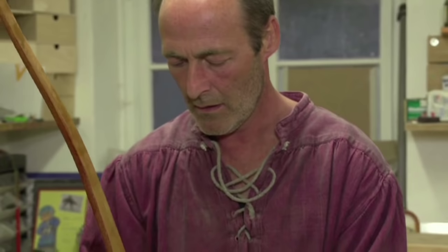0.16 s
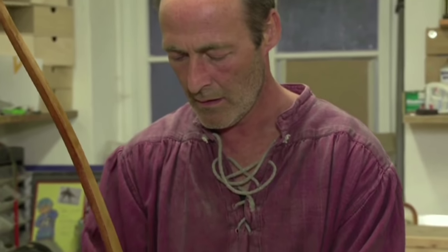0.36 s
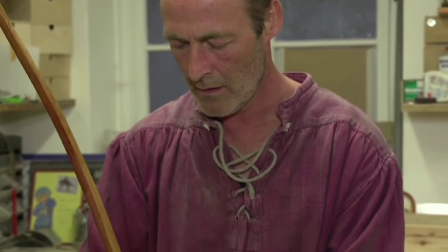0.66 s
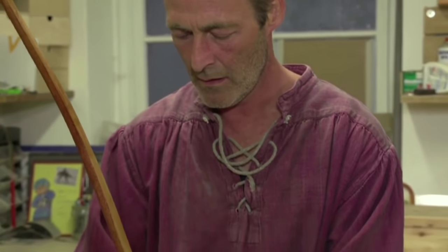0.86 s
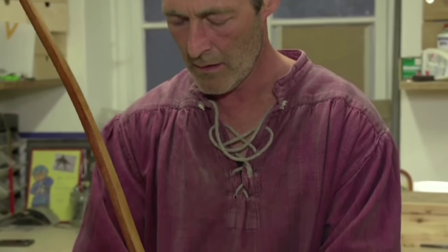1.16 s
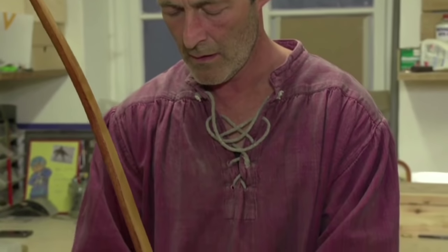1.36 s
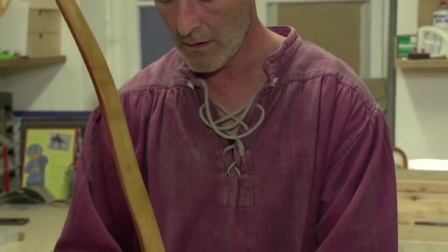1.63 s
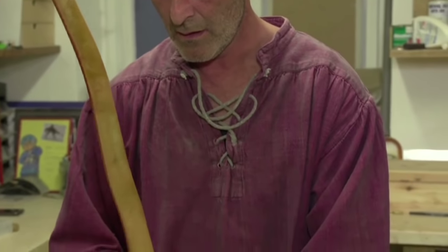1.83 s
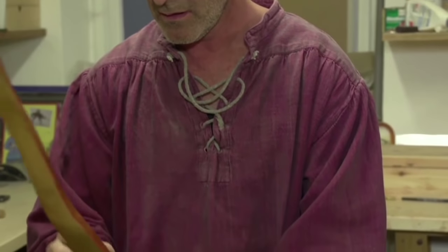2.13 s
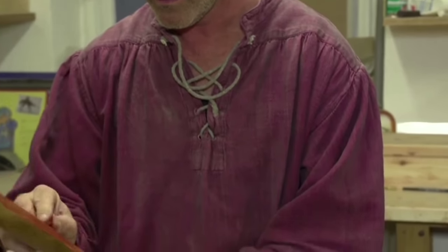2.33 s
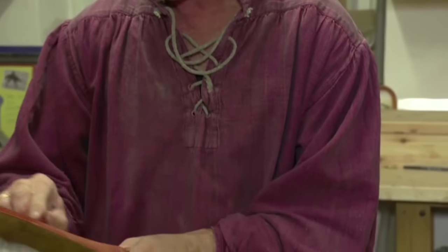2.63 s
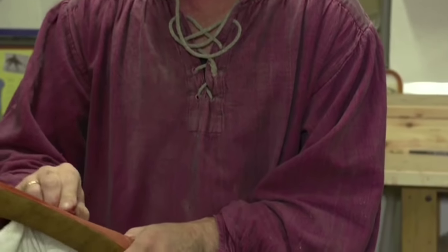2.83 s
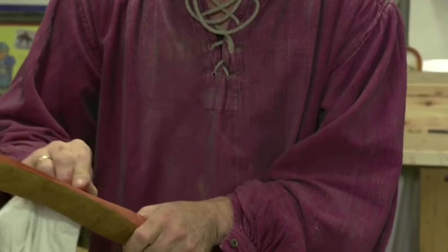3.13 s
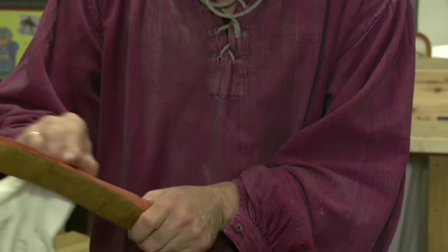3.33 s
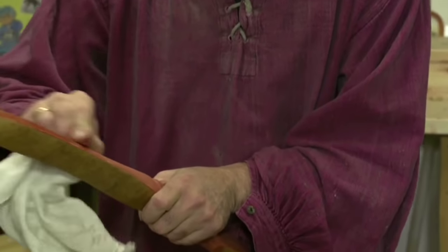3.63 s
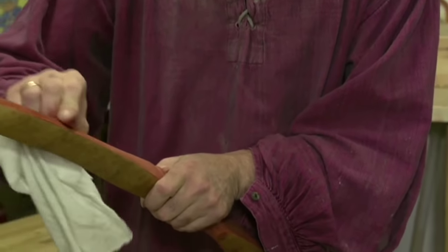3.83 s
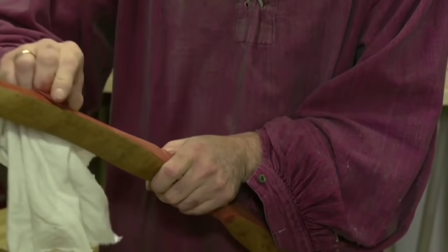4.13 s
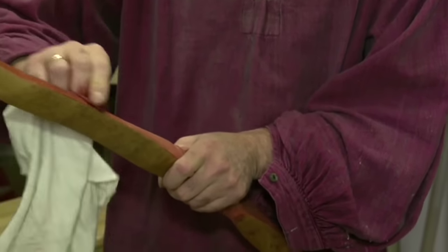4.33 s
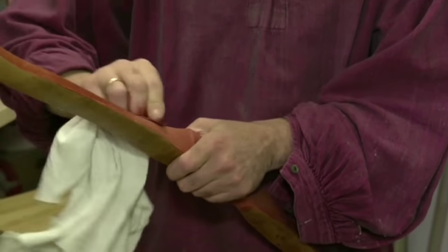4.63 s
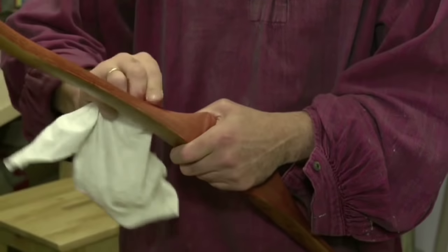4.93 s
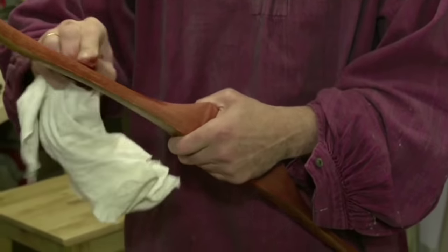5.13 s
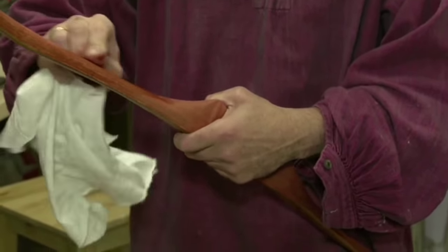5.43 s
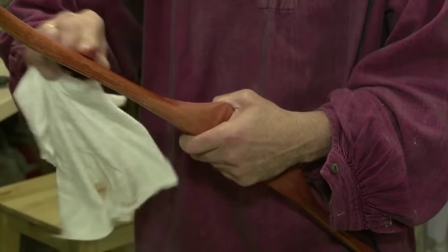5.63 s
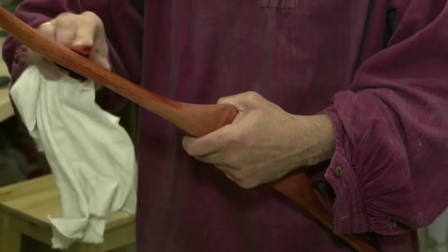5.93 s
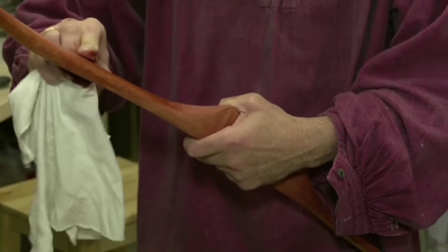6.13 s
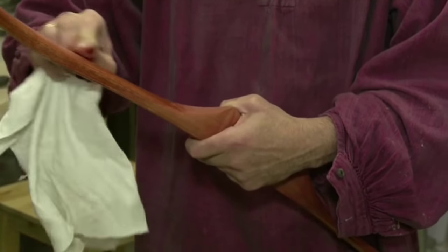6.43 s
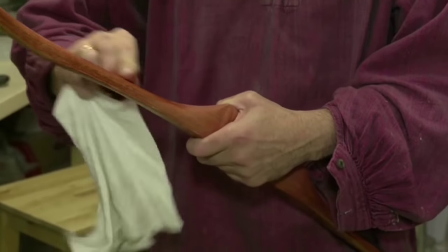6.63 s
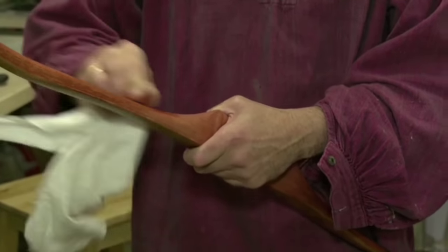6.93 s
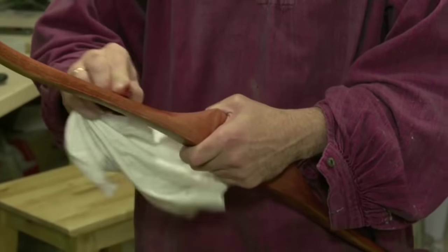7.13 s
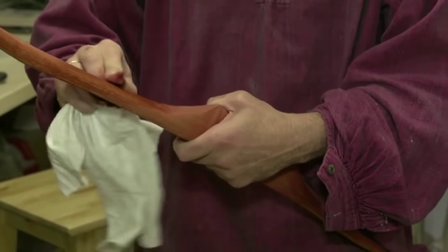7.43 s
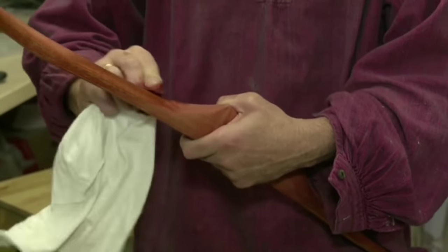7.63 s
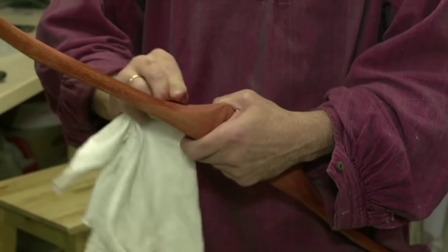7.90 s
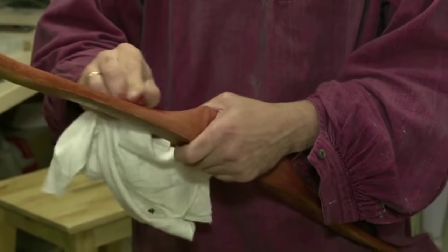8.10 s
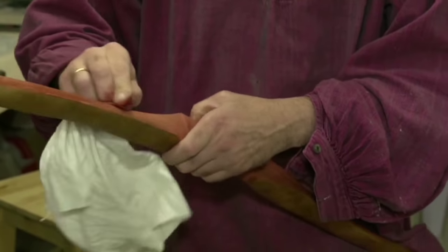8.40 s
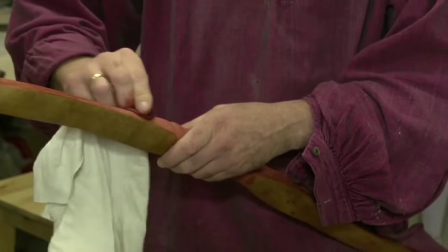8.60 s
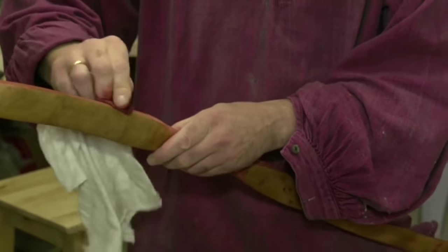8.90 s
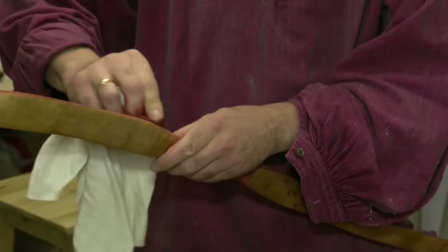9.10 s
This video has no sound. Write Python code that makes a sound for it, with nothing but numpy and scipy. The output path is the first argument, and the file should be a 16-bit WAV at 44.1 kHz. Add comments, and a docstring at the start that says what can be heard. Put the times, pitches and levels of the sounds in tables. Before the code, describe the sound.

A close microphone in a small workshop hears a cloth rubbed on a wooden bow limb. From 0 to 1.5 s the strokes are light, thin and quick, slowing to one longer pass after 1 s; from about 1.6 to 2 s the rubbing nearly disappears. At 2.05 s a soft bump and rustle bring a firmer stroke, and brisk push-pull swishing settles in at about seven strokes a second, dry and bright with tiny thread ticks and a faint hollow woody ring. Soft thuds fall near 4.3 and 6 s, with low padded knocks at 5.3-5.8 and 6.2 s. Around 7-7.8 s bumps cluster, with a knock and muffled cloth flaps. The rubbing grows duller after 8 s, with bumps near 8.2, 8.6 and 9 s and the strongest thud at 9.2 s, just before the end. Low rumble, weak hum and faint air remain throughout.

```python
"""Cloth rubbed on a wooden bow

A cloth is rubbed briskly to and fro along a bow limb in a small workshop, often about seven strokes a second.
Shaped noise makes each stroke grip, hiss and slow to the turn; resonances let the limb ring faintly under it.
Gritty noise makes cloth and sleeves rustle; decaying tones are knocks, and short low pulses are soft bumps.
Behind them, coloured noise gives a low rumble and faint air, and narrow bands of noise give a hum."""
import sys
import numpy as np
from scipy import signal
from scipy.fft import rfft, irfft, next_fast_len
from scipy.io import wavfile
from scipy.ndimage import uniform_filter1d

SR = 44100
rng = np.random.default_rng(int(sys.argv[2]) if len(sys.argv) > 2 else 0)


def transcribe(signal):
    """Save signal, clipped to [-1, 1], as a 16-bit WAV file at the path in sys.argv[1]."""
    frames = np.atleast_2d(signal).T
    limited = np.clip(frames, -1, 1)
    pcm = np.round(limited * 32767).astype(np.int16)
    wavfile.write(sys.argv[1], SR, pcm)


N = 408366
TIME = np.arange(N) / SR
SIZE = next_fast_len(N, real=True)
FREQS = np.maximum(np.arange(SIZE // 2 + 1) * SR / SIZE, 1)


def from_db(db):
    """Turn decibels into gain."""
    return 10 ** (np.asarray(db) / 20)


def rms_one(x):
    """Scale to an rms (average strength) of 1."""
    return x / np.sqrt(np.mean(x ** 2) + 1e-20)


def over_time(points):
    """Join (time, value) points with straight lines."""
    return np.interp(TIME, *np.transpose(points))


def over_hz(points):
    """Join (frequency, value) points on a log-frequency axis."""
    hz, value = np.transpose(points)
    return np.interp(np.log(FREQS), np.log(hz), value)


def resonances(modes):
    """Gain over frequency of (frequency, width, level) resonances; each level sets the power of its peak."""
    power = 0
    for hz, width, db in modes:
        detuning = (FREQS ** 2 - hz ** 2) / (FREQS * width)
        power = power + from_db(db) ** 2 / width / (1 + detuning ** 2)
    return np.sqrt(power)


def filtered(x, gain):
    """Apply a gain over frequency."""
    return irfft(rfft(x, SIZE) * gain, SIZE)[..., :N]


def drift(rate_hz):
    """Random wandering of rms 1, mostly slower than the given rate."""
    return rms_one(filtered(rng.standard_normal(N), 1 / (1 + (FREQS / rate_hz) ** 4)))


# how alike left and right are: (frequency [Hz], likeness [0-1])
SIDE_LIKENESS = [(25, 1), (55, 1), (90, 0.99), (150, 0.97), (300, 0.94), (1200, .97), (2500, 1),
                 (4500, 0.9), (9000, 0.82), (15000, 0.75)]


def noise(gain, grain=1):
    """Stereo noise of a given colour, less alike in the treble; a varying grain makes it gritty."""
    alike = np.clip(over_hz(SIDE_LIKENESS), 0, .9995)
    raw = rng.standard_normal((2, N)) * grain
    mid, side = filtered(raw, gain * np.sqrt([1 + alike, 1 - alike]))
    return rms_one(np.array([mid + side, mid - side]))


# strokes, push and pull in turn, each lasting until the next; the swell is the rise along the stroke:
# (start time [s], relative level [dB], swell [dB], time to grip [s])
STROKE_LIST = [(0.0, -52.5, -7, 0.0038), (.074, -51, 1, 0.011), (.219, -49, 1.5, 0.008),
               (.364, -49, 0.5, 0.011), (.557, -53.5, -2.5, .014), (.666, -50, 1.5, .025),
               (.84, -50.5, -3, .01), (.98, -50.5, 2, 0.019), (1.49, -55, -1.5, 0.022),
               (1.612, -62.5, -18, 0.022), (2.05, -43.5, 4.5, 0.083), (2.25, -46.5, -1, 0.031),
               (2.419, -44.5, 0.5, 0.0087), (2.548, -47, -0.5, .01), (2.69, -44, 0.5, 0.005),
               (2.816, -45.2, 1.5, 0.018), (2.983, -44, 5, 0.0065), (3.125, -44.5, 0.5, 0.015),
               (3.282, -44, 3, 0.016), (3.424, -46, 1, .014), (3.584, -42.5, 1.5, 0.008),
               (3.696, -45.5, 3, .02), (3.872, -43.5, -1.5, 0.0035), (3.994, -44.5, 4, .01),
               (4.151, -43.5, 6, .007), (4.322, -44.5, 0, 0.023), (4.494, -43.5, 4, 0.033),
               (4.644, -46, 3, 0.03), (4.816, -43, 0.5, 0.031), (4.957, -46.5, 2, 0.022),
               (5.104, -43.5, 0, .005), (5.233, -47, 2.5, 0.019), (5.385, -44.5, 1, 0.0079),
               (5.505, -48.5, -0.5, .018), (5.627, -46, -2.5, 0.013), (5.74, -49.5, -4, .011),
               (5.843, -45.5, -0.5, 0.0085), (5.95, -48.5, 2.5, .011), (6.079, -45, 3, .006),
               (6.262, -47, 3, .013), (6.491, -44.5, 7.5, 0.0092), (6.714, -47.5, -2.5, 0.014),
               (6.872, -46.8, -1, 0.029), (7.005, -46.5, -1.5, 0.019), (7.157, -47.5, -0.5, 0.02),
               (7.303, -46.7, -1.5, .03), (7.449, -47, 4, 0.019), (7.619, -48, -0.5, 0.03),
               (7.76, -46, 6, 0.013), (7.911, -48, -2, 0.013), (8.065, -46.5, 2.5, 0.029),
               (8.231, -49, -0.5, 0.0049), (8.363, -45, -1, 0.0064), (8.486, -48.5, 1.5, 0.0093),
               (8.614, -44, 0.5, .004), (8.757, -47.5, -2, 0.009), (8.895, -46, -0.5, 0.0045),
               (9.026, -50, -1, 0.0075), (9.173, -51, 2.5, 0.0089)]
# resonance of the hand cupped round the cloth, before the swell adds to it: (time [s], level [dB])
HAND_CUP = [(0, 3), (1.15, -2), (1.7, 1), (2.6, -0.5), (3.2, -0.5), (3.9, -5), (4.3, -1), (6.7, -.5),
            (7.8, -2), (8.6, -5)]
CUP_PER_SWELL = 0.74  # the hand closes as it bears down: dB of resonance per dB of swell
# dip at the turn for an ordinary grip time; it is shallower by some dB for each doubling of that time
LULL_DB, ORDINARY_GRIP_S, LULL_DB_PER_DOUBLING = -9, 0.013, 2
CATCH, CATCH_SHARE = 0.72, 0.32  # this share of the rise comes in this share of the grip time
SLOWING_SHARE, LONGEST_SLOWING_S = 0.4, 0.095  # the last part of a stroke slows to the turn
BRAKING, BRAKING_SHARE = .82, 0.68  # this share of the fall comes in this share of the slowing
LATER_PER_SWELL = 0.038  # a stroke that bears down stops faster: share of slowing lost per dB of swell
FIRM_WOOD_DB = -1  # woodiness of a firm stroke
BRUSHING_DB, WOOD_STAYS = -51.5, 0.77  # below this level, woodiness regains this share of the drop


def stroke_controls():
    """Friction level, woodiness and cupping in dB: each stroke breaks loose, slides, then slows to the turn."""
    start, stroke_db, swell_db, grip_s = np.transpose(STROKE_LIST)
    end = np.append(start[1:], TIME[-1] + .04)
    bears_db = np.maximum(swell_db, 0)
    slow_s = np.minimum(SLOWING_SHARE * (end - start), LONGEST_SLOWING_S)
    slow_s = slow_s * np.clip(1 - LATER_PER_SWELL * bears_db, .2, 1)
    gripped, slowing = start + grip_s, end - slow_s

    first_db, last_db = stroke_db - swell_db / 2, stroke_db + swell_db / 2
    lull_db = LULL_DB + LULL_DB_PER_DOUBLING * np.log2(grip_s / ORDINARY_GRIP_S)
    turn_db = (np.append(first_db[0], last_db[:-1]) + first_db) / 2 + lull_db
    caught_db = turn_db + CATCH * (first_db - turn_db)
    braked_db = last_db + BRAKING * (np.roll(turn_db, -1) - last_db)
    # five points per stroke: turn, caught, gripped, slowing, nearly stopped
    caught, braked = start + CATCH_SHARE * grip_s, slowing + BRAKING_SHARE * slow_s
    moments = np.c_[start, caught, gripped, slowing, braked]
    levels = np.c_[turn_db, caught_db, first_db, last_db, braked_db]
    level_db = np.interp(TIME, moments.ravel(), levels.ravel())

    # pressure follows the sliding parts only, without the dips at the turns
    sliding = np.c_[gripped, slowing].ravel()
    pressure_db = np.interp(TIME, sliding, np.c_[first_db, last_db].ravel())
    wood_db = FIRM_WOOD_DB + WOOD_STAYS * np.maximum(BRUSHING_DB - pressure_db, 0)
    bearing_db = np.interp(TIME, sliding, np.c_[np.zeros(len(start)), bears_db].ravel())
    cup_db = over_time(HAND_CUP) + CUP_PER_SWELL * bearing_db
    return level_db, wood_db, cup_db


# colour of the friction hiss: (frequency [Hz], relative level per Hz [dB])
HISS_COLOUR = [(400, -27), (1000, -10.5), (1600, -10), (2500, -6.5), (3300, -3.5), (4400, -0.5),
               (5700, -2.5), (7500, -2), (9000, -1.14), (11300, -1.5), (12400, -4.5), (15300, -9)]
# middles of the bands in which the hiss changes colour: (frequency [Hz])
HISS_BAND_MIDDLES = [1200, 1900, 2500, 3100, 3900, 4900, 6200, 8000, 10500, 13500]
# treble slope as the cloth works along the limb, before scaling by tilt: (time [s], slope [dB per octave])
TREBLE_SLOPE = [(0, 2), (.8, -0.5), (1.1, 0), (1.7, -2.5), (2.1, 1), (2.7, -3), (4.4, -2.5), (5.0, .5),
                (5.6, 1), (6.2, -1.5), (7.2, -2.5), (8.0, -5), (9.26, -6)]
HISS_DB = 2  # added to the stroke levels
CUP_HZ, CUP_OCTAVES = 3100, 0.35  # middle and spread of the cupped resonance


def rubbing(grit_db, patchy_db, tilt, speed_tilt, wood_follow, wood_hz):
    """Threads catch and slip on the wood; a faster slide is louder and brighter, and the limb rings along."""
    level_db, wood_db, cup_db = stroke_controls()
    mean_db = uniform_filter1d(level_db, SR // 3)
    speed_db = level_db - mean_db  # level above its own average stands for speed
    bright_db = over_time(TREBLE_SLOPE)
    threads = from_db(grit_db * drift(rate_hz=1700))
    hiss = noise(from_db(over_hz(HISS_COLOUR)), threads)
    swish = 0
    for hz, one_band in zip(HISS_BAND_MIDDLES, np.eye(len(HISS_BAND_MIDDLES))):
        octaves = np.log2(hz / 6200)
        woody = 1 / (1 + (hz / wood_hz) ** 6)  # near 1 in the low bands, near 0 in the high ones
        colour_db = octaves * speed_tilt * speed_db
        colour_db += (1 - woody) * octaves * tilt * bright_db + woody * wood_db
        colour_db += cup_db * np.exp(-(np.log2(hz / CUP_HZ) / CUP_OCTAVES) ** 2)
        # folds shift under the fingers, so each band wanders a little on its own
        colour_db += patchy_db * drift(rate_hz=17.6)
        band = filtered(hiss, over_hz(np.c_[HISS_BAND_MIDDLES, one_band]))
        swish += band * from_db(level_db + colour_db)
    swish = from_db(HISS_DB) * swish + snags(level_db, per_s=23, size_db=17, spread_db=4.5)
    ringing = limb(mean_db + wood_follow * speed_db + wood_db, wander_db=3)
    return near_echoes(swish, share=0.12, apart_s=8e-5) + ringing


def snags(level_db, per_s, size_db, spread_db):
    """Now and then a single thread snaps free with a tiny tick."""
    uneven_db = spread_db * np.clip(rng.standard_normal(N), -2, 2)
    ticks = (rng.random(N) < per_s / SR) * from_db(level_db + size_db + uneven_db)
    return signal.sosfilt(signal.butter(1, [2500, 11000], "band", fs=SR, output="sos"), ticks)


def near_echoes(x, share, apart_s, count=24):
    """Chest, bench and floor return many faint early copies, each at its own moment on the two sides."""
    out = x.copy()
    for when, direction, sign in rng.random((count, 3)):
        delay = .001 + .022 * when
        gain = share * np.sign(sign - .5) * np.exp(-delay / 0.02)
        for side, ear in enumerate((1, -1)):
            lag = max(int((delay + ear * apart_s * (direction - .5)) * SR), 1)
            out[side, lag:] += gain * x[side, :-lag]
    return out


# bending modes of the limb under the cloth: (frequency [Hz], width [Hz], relative level [dB])
LIMB_MODES = [(1180, 75, 5), (1348, 41, 4.5), (1570, 51, 4.5), (1810, 43, 12.5), (2080, 60, 6),
              (2270, 22, 3), (2770, 89, 1), (3630, 140, 4.5), (4391, 220, -10), (5020, 100, -1)]
# limb modes that sing out while grip and contact favour them; the filter is squared, so they sound narrower:
# (start time [s], end time [s], frequency [Hz], filter width [Hz], level relative to the limb's drive [dB])
SINGING_MODES = [(0.046, .75, 1710, 65, -17), (.55, 1.198, 1230, 90, -20), (1.475, 1.75, 1550, 130, -22.5),
                 (1.6, 3.8, 1805, 90, -20), (2.4, 4.5, 1590, 80, -21.5), (4.9, 6.25, 1544, 110, -17),
                 (8.05, 9.26, 2320, 110, -20)]
WOOD_DB = -20  # each group of modes, relative to the limb's drive


def limb(contact_db, wander_db):
    """The limb rings under the cloth; three groups of modes come and go, and some modes sing out for a while."""
    out = 0
    for group in (LIMB_MODES[0::3], LIMB_MODES[1::3], LIMB_MODES[2::3]):
        out = out + noise(resonances(group)) * from_db(WOOD_DB + wander_db * drift(rate_hz=6.9))
    for start, end, hz, width, db in SINGING_MODES:
        favoured = np.clip(np.minimum(TIME - start, end - TIME) / 0.052, 0, 1)  # fades in and out
        tone = filtered(rng.standard_normal(N), resonances([(hz, width, 0)]) ** 2)
        out += from_db(db) * favoured * rms_one(tone)
    return out * from_db(contact_db)


# loose cloth and sleeves, before RUSTLE_DB is added: (time [s], level [dB])
RUSTLE_LEVEL = [(0.0, -69.5), (2.04, -69), (2.16, -55), (2.27, -69.5), (2.53, -63), (3.76, -64),
                (3.94, -70.5), (4.85, -62), (4.98, -68.5), (5.6, -63), (6.29, -71.5), (7.43, -62.5),
                (7.45, -58), (7.58, -70), (7.69, -59.5), (8.33, -72.5), (9.18, -69), (9.26, -64)]
# colour of the rustle: (frequency [Hz], relative level per Hz [dB])
RUSTLE_SPECTRUM = [(150, -18), (300, -4.5), (500, 3), (800, 3), (1300, 0.5), (2500, -6.5), (6000, -14),
                   (15000, -29)]
# the cloth flaps against the hand: (middle time [s], peak level [dB], length [s])
FLAP_LIST = [(7.452, -54, 0.036), (7.498, -55, 0.053), (7.72, -55.5, 0.066)]
# colour of the flaps: (frequency [Hz], relative level per Hz [dB])
FLAP_SPECTRUM = [(70, -6), (130, 3), (250, 5), (480, -3), (700, -9), (1300, -7), (2500, -22), (8000, -26)]
RUSTLE_DB = 2.06


def rustle(crumple_db):
    """The hanging cloth and the sleeves swing with the arm, and the loose end flaps against the hand."""
    folds = from_db(crumple_db * drift(rate_hz=94))
    loose = noise(from_db(over_hz(RUSTLE_SPECTRUM)), folds)
    loose *= from_db(over_time(RUSTLE_LEVEL) + RUSTLE_DB)
    flap = 0
    for s, db, length in FLAP_LIST:
        flap = flap + from_db(db) * np.exp(-2 * ((TIME - s) / length) ** 2)
    return loose + flap * noise(from_db(over_hz(FLAP_SPECTRUM)))


# knocks on the bow; the last column shortens the ring:
# (time [s], relative level [dB], contact cut-off [Hz], share of the free ring length [0-1])
KNOCK_LIST = [(5.343, -43, 131, 0.6), (5.405, -45, 220, 0.53), (5.716, -37, 254, 0.56),
              (5.735, -38, 220, 0.54), (5.806, -42.5, 232, 1), (6.244, -31.5, 200, 1.0),
              (7.432, -35.5, 156, 0.83), (9.211, -41, 191, 0.82)]
# low modes of the bow in the hand: (frequency [Hz], relative level [dB], free time to fall 60 dB [s])
BOW_MODES = [(90.7, 6, 0.4), (108, -7.5, 0.15), (123.6, -1, 0.21), (169, -12, 0.2), (212, 1, 0.087),
             (232, -8, 0.23)]


def knocks():
    """Padded contacts set the low modes of the bow ringing; the grip damps them."""
    out = np.zeros(N)
    t = TIME[:SR // 2]
    for s, level_db, contact_hz, free in KNOCK_LIST:
        ring = 0
        for hz, db, t60 in BOW_MODES:
            ring = ring + from_db(level_db + db - 60 * t / (t60 * free)) * np.sin(2 * np.pi * hz * t)
        at = round(s * SR)
        padding = signal.butter(5, contact_hz, fs=SR, output="sos")
        out[at:at + len(t)] -= signal.sosfilt(padding, ring)[:N - at]
    # a slim limb radiates no deep bass
    return signal.sosfilt(signal.butter(2, 48, "high", fs=SR, output="sos"), out)


# soft bumps of handling: (middle time [s], peak level [dB], pitch [Hz], length [s])
BUMP_LIST = [(2.053, -38.5, 62.5, 0.096), (4.32, -39, 73, 0.051), (4.674, -48, 67.6, .07),
             (5.985, -34, 78, 0.05), (6.986, -32, 65, 0.031), (7.126, -33, 70.5, 0.046),
             (7.464, -28.5, 72, 0.048), (7.503, -32, 55.3, .06), (7.554, -30, 64.3, 0.048),
             (7.765, -32.5, 68, 0.03), (8.181, -37, 69, 0.032), (8.639, -37, 73, 0.098),
             (8.974, -30.5, 70, 0.048), (9.235, -22.3, 74.4, 0.046)]


def bumps():
    """Dull thuds: low tones that swell and fade within a few cycles."""
    out = np.zeros(N)
    for s, level_db, hz, length in BUMP_LIST:
        near = np.abs(TIME - s) < length
        t = TIME[near] - s
        swell = from_db(level_db) * np.exp(-np.pi * (2 * t / length) ** 2 / 2)
        out[near] += swell * np.cos(2 * np.pi * (hz * t + rng.random()))
    return out


# rumble changes, added to RUMBLE_DB: (time [s], level [dB])
RUMBLE_CHANGES = [(0, 1.5), (.7, -2.5), (2.1, 1.5), (3.8, -2.5), (5.3, .5), (6.5, -2.5), (7.2, 2),
                  (8.4, -3), (9.26, 2)]
# colour of the rumble, before an extra treble cut: (frequency [Hz], relative level per Hz [dB])
RUMBLE_COLOUR = [(20, -39), (30, -22), (38, -6), (52, 0), (68, 2.5), (95, 2), (112, -8), (140, -11),
                 (165, -17.5), (242, -24.5), (280, -31.5), (450, -31.5), (900, -52)]
# colour of the air noise: (frequency [Hz], relative level per Hz [dB])
AIR_COLOUR = [(250, 16), (500, 1), (1000, 4.5), (2000, 0), (4500, 5), (8000, -1), (15000, -16)]
# hum: (frequency [Hz], width [Hz], level [dB])
HUM_BANDS = [(102.3, 2.3, -61), (203.2, 3.9, -66), (299.6, 11, -76.5), (401, 6.9, -76.5)]
RUMBLE_DB, AIR_DB = -49, -68


def workshop():
    """Noise shaped into a slowly swelling rumble, a wavering hum in narrow bands, and faint air."""
    treble_cut = 1 / (1 + (FREQS / 1500) ** 2)
    rumble = noise(from_db(over_hz(RUMBLE_COLOUR)) * treble_cut)
    rumble *= from_db(RUMBLE_DB + over_time(RUMBLE_CHANGES))
    hum_level = np.sqrt(np.sum(from_db(np.array(HUM_BANDS)[:, 2]) ** 2))
    hum = hum_level * noise(resonances(HUM_BANDS))
    air = from_db(AIR_DB) * noise(from_db(over_hz(AIR_COLOUR)))
    return rumble + hum + air


RIGHT_LEAD_S = 2.0e-5


def scene():
    """Add all the sounds; the cloth reaches the right side a moment before the left."""
    cloth = rubbing(grit_db=0.5, patchy_db=1.48, tilt=0.84, speed_tilt=0.2, wood_follow=0.76, wood_hz=2780)
    cloth = cloth + rustle(crumple_db=3.0)
    left_right_delay = RIGHT_LEAD_S * np.array([[1], [0]])
    cloth = filtered(cloth, np.exp(-2j * np.pi * FREQS * left_right_delay))
    return cloth + knocks() + bumps() + workshop()


CUTOFF_HZ = 15600


def record(dry):
    """The top is cut steeply above the cut-off."""
    return filtered(dry, 1 / np.sqrt(1 + (FREQS / CUTOFF_HZ) ** 240))


dry = scene()
out = record(dry)
transcribe(out)
```